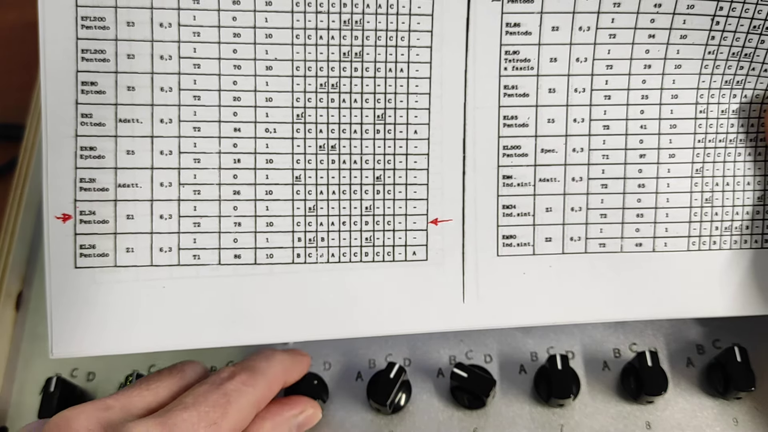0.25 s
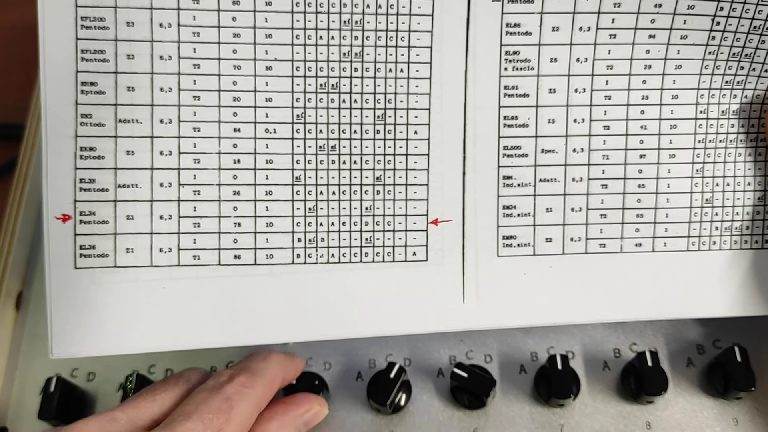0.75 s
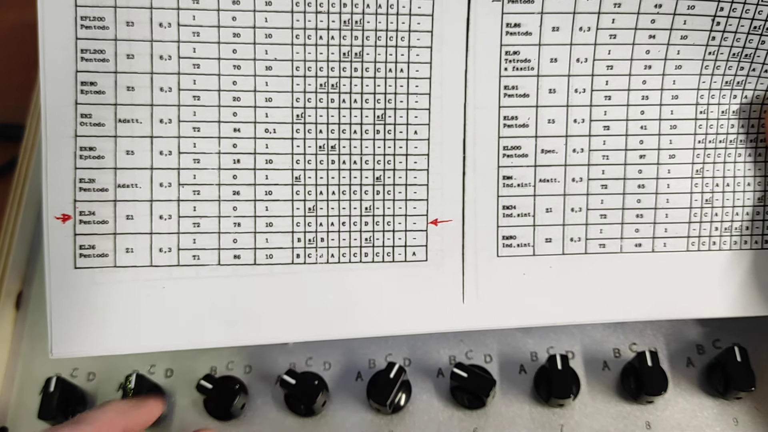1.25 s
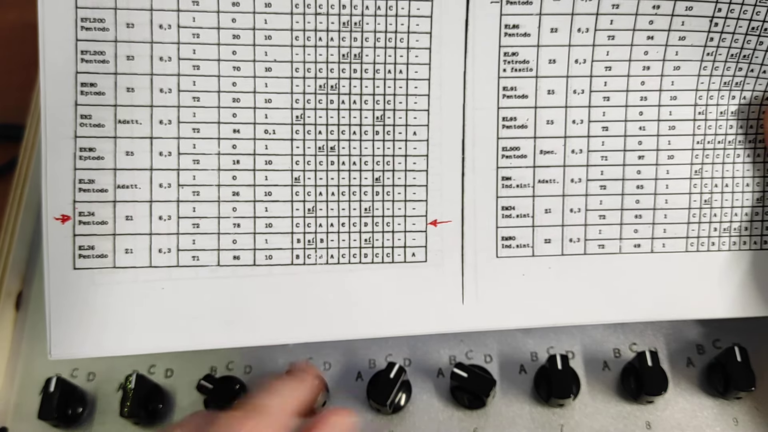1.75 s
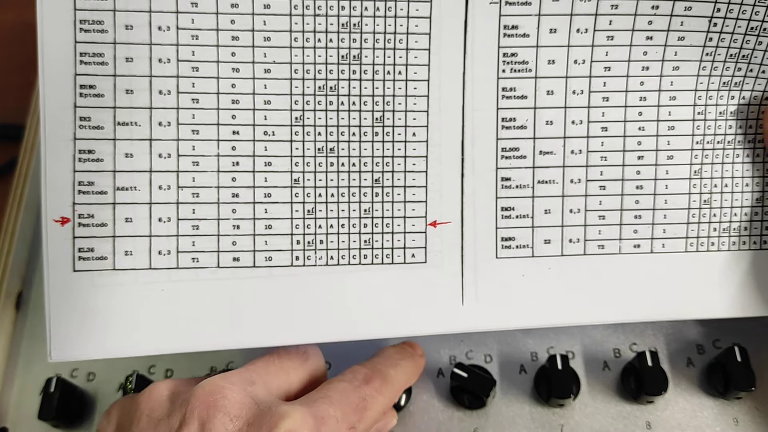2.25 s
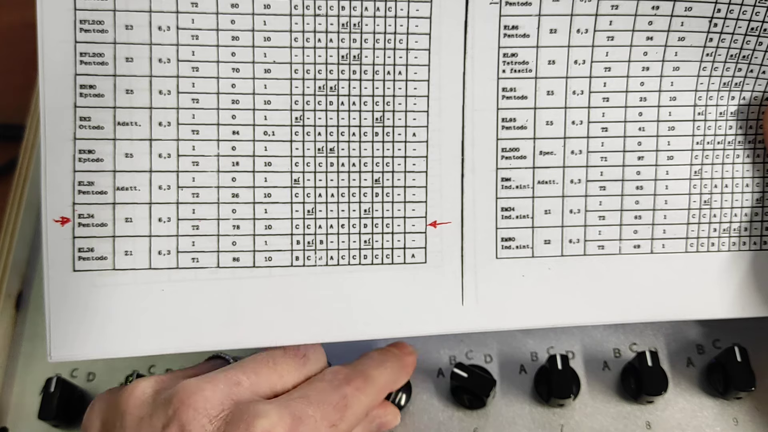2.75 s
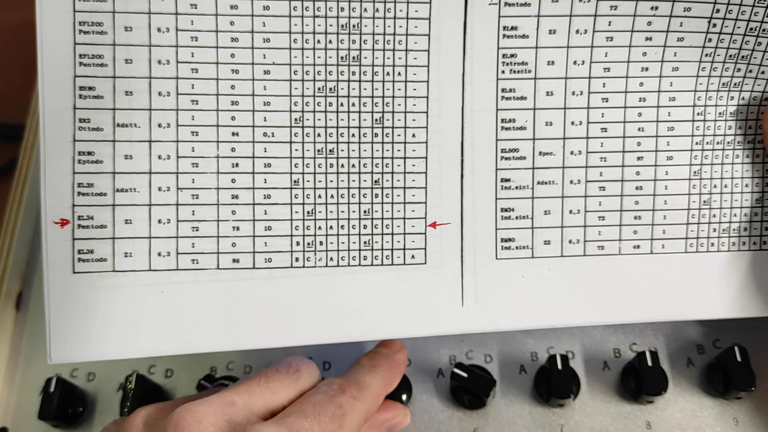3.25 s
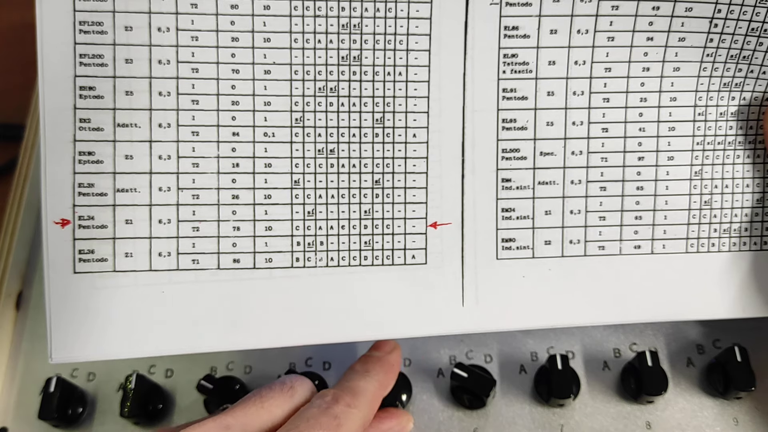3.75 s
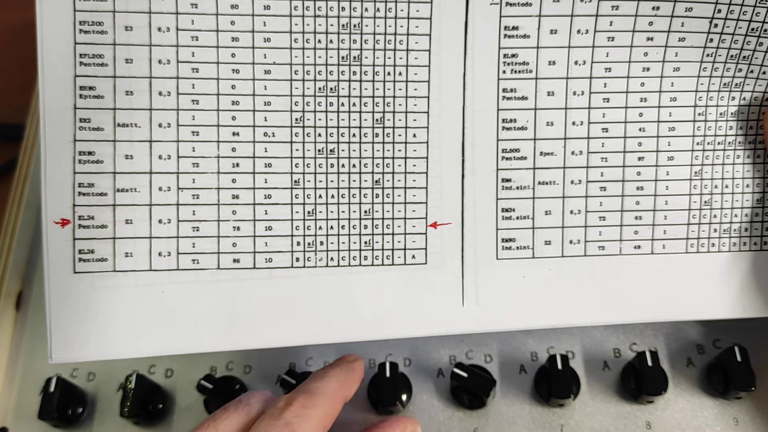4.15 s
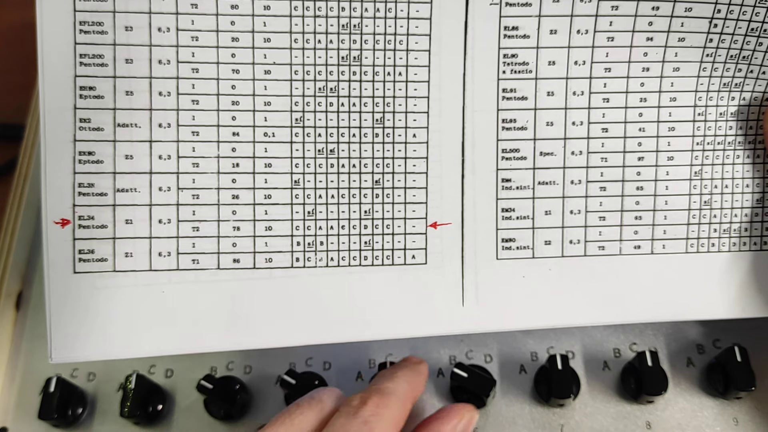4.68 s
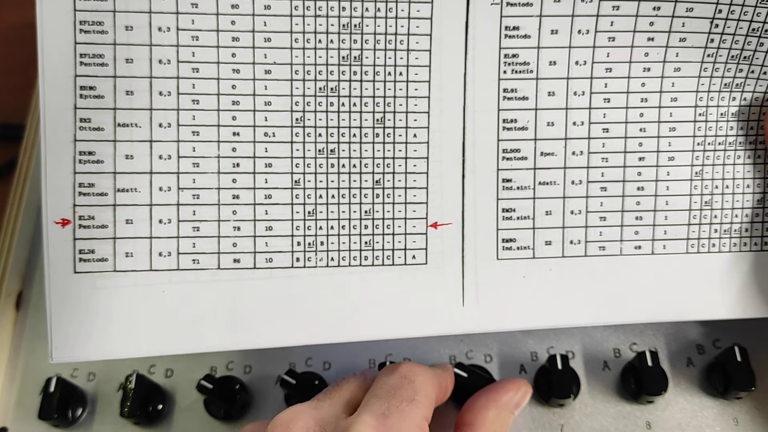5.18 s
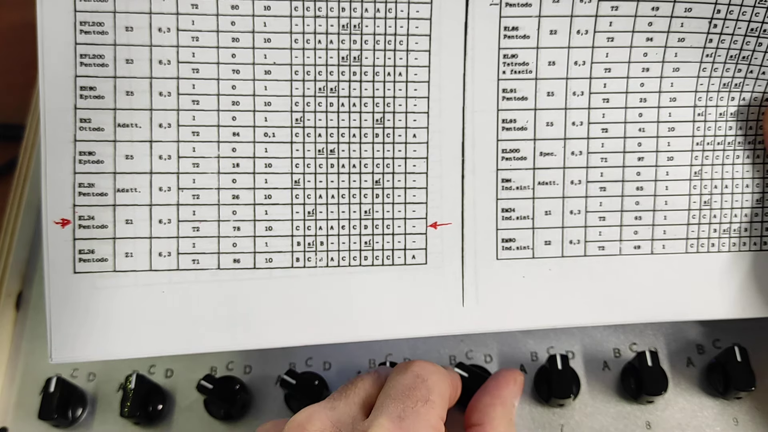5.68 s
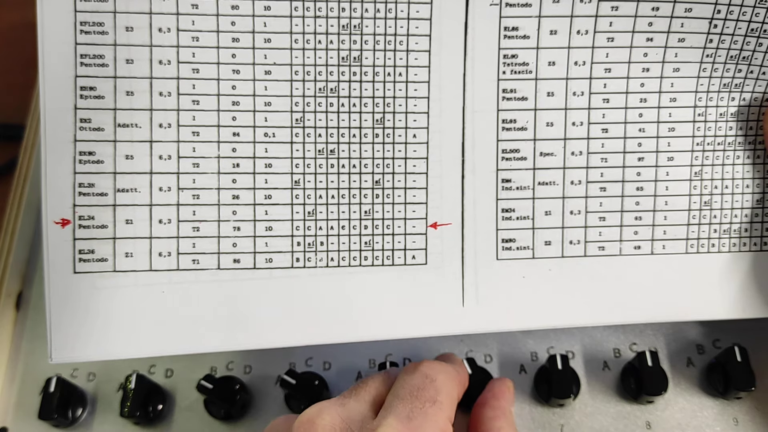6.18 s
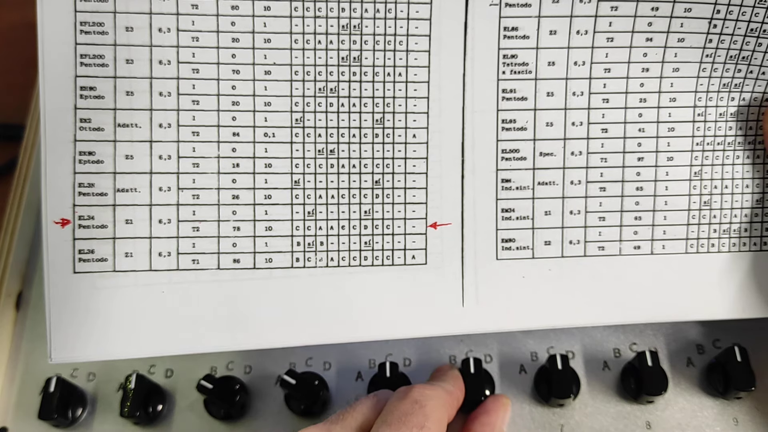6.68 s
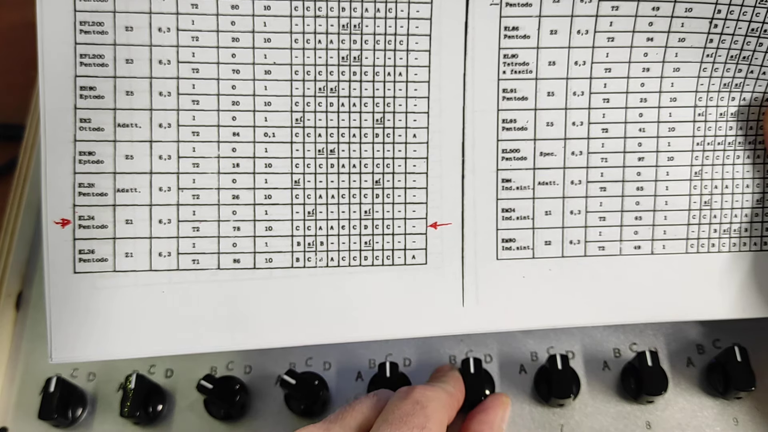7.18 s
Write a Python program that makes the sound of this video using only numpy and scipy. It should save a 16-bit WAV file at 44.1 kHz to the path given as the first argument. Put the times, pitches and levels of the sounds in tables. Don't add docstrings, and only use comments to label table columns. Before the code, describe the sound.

Low muffled traffic and a humming engine are heard first, mostly left, gradually receding. Over them, stiff spring-loaded knobs click on a metal box right beside a stereo microphone: one loud rattly snap early, a weaker one nearly halfway through, then a quick hard pair late. Between them are barely audible dull finger knocks. Each snap is dry and bright with a short, light indoor reverberation.

```python
import sys
import numpy as np
from scipy import signal
from scipy.fft import rfft, irfft, next_fast_len
from scipy.io import wavfile
from scipy.ndimage import uniform_filter1d, minimum_filter1d, map_coordinates

SR = 44100
rng = np.random.default_rng(int(sys.argv[2]) if len(sys.argv) > 2 else 0)


def output_pcm(signal):
    pcm = np.clip(np.atleast_2d(signal).T, -1, 1) * 32767
    wavfile.write(sys.argv[1], SR, np.round(pcm).astype(np.int16))


def amplitude_ratio(level_db):
    exponent = np.asarray(level_db, float) / 20
    return 10 ** exponent


N = 327663

# resonance in Hz, width in Hz.
PORTS = [(8370, 830), (7210, 670)]


def unit(x):
    return x / np.sqrt(np.mean(x ** 2) + 1e-20)


def along(points, hz):
    f, v = np.transpose(points)
    return np.interp(np.log(hz + 1), np.log(f + 1), v)


def curves(rows):
    s, *cols = np.transpose(rows)
    return [np.interp(np.arange(N) / SR, s, c) for c in cols]


def wobble(rate):
    knots = rng.standard_normal(int(N * rate / SR) + 4)
    return map_coordinates(knots, [np.arange(N) * rate / SR])


def filtered(x, response):
    m = next_fast_len(x.shape[-1] + SR // 4)
    shaped = rfft(x, m) * response(np.fft.rfftfreq(m, 1 / SR))
    return irfft(shaped, m)[..., :x.shape[-1]]


def band(x, low_hz, high_hz):
    return signal.sosfilt(signal.butter(2, [low_hz, high_hz], "band", fs=SR, output="sos"), x)


def add(into, x, s):
    part = into[:, round(s * SR):][:, :x.shape[-1]]
    part += x[..., :part.shape[-1]]


def passing(base_db, rows):
    t = np.arange(N) / SR
    gain = 0
    for s, db, swell, fade in rows:
        gain = gain + amplitude_ratio(db) * np.exp(-((t - s) / np.where(t < s, swell, fade)) ** 2)
    return 20 * np.log10(np.hypot(amplitude_ratio(base_db), gain))


def rush(spectrum, patchy_db):
    # frequency in Hz, likeness of left and right from 0 to 1.
    alike = [(40, 0.85), (150, 0.91), (300, 0.7), (600, 0.17), (1200, .35), (2500, .2), (5000, .05)]
    # frequency in Hz, left over right in dB.
    lean = [(40, 3), (110, 6), (400, 4), (1300, 3.5), (2400, 1), (5000, -1)]
    lead_s = 0.00043
    z = signal.stft(rng.standard_normal((2, N)), nperseg=1024)[2]
    patches = uniform_filter1d(rng.standard_normal(z.shape[1:]), size=6, axis=0)
    patches = uniform_filter1d(patches, size=8, axis=1)
    pair = signal.istft(z * amplitude_ratio(patchy_db * unit(patches)), nperseg=1024)[1][:, :N]

    def mid_and_side(hz):
        angle = np.arccos(np.clip(along(alike, hz), -1, 1)) / 2
        return amplitude_ratio(along(spectrum, hz)) * [np.cos(angle), np.sin(angle)]

    def left_and_right(hz):
        half = amplitude_ratio(along(lean, hz) / 2) * np.exp(1j * np.pi * hz * lead_s)
        return np.array([half, 1 / half])

    mid, side = filtered(pair, mid_and_side)
    both = filtered(np.array([mid + side, mid - side]), left_and_right)
    return both / np.std(both.mean(axis=0))


def hiss():
    # frequency in Hz, level in dB per Hz.
    hiss_color = [(200, -37.5), (1500, -6), (4000, 5.5), (9000, 0.5), (11000, -11), (16000, -20)]
    return unit(filtered(rng.standard_normal((2, N)), lambda hz: amplitude_ratio(along(hiss_color, hz))))


def traffic():
    # time in seconds, tyre rush in dB.
    stream = [(0, -65.5), (1.1, -66), (1.4, -69.5), (2.2, -73), (3.2, -71), (3.7, -74.5), (4.5, -74.5),
              (5.7, -80), (6.8, -83), (7.43, -78)]
    # loudest moment in seconds, level in dB, swell in seconds, fade in seconds.
    vans = [(0.01, -62.5, 0.14, 0.37), (.75, -59.5, 0.3, 0.55), (1.4, -69.5, 0.33, 0.46),
            (3.1, -73.5, 0.45, 0.52), (4.75, -65.5, 0.14, 0.35), (5.3, -68, 0.34, 0.36),
            (6.001, -72, .4, 0.6), (6.9, -72, 0.89, .6)]
    lorries = [(.3, -61, .3, 0.56), (.93, -55, 0.1, 0.52), (1.9, -62.5, 0.27, .6), (3, -63, 0.39, .3),
               (3.65, -60.5, 0.23, 0.092), (4.8, -63.5, 0.45, .3), (5.75, -67, .1, .1),
               (6.4, -64, 0.16, 0.33), (7.18, -64, 0.11, 0.33)]
    # frequency in Hz, level in dB per Hz.
    rumble_color = [(12, -30.5), (20, -1.5), (38, -2.5), (54, 0.5), (67, -11), (85, -13.5), (110, -48),
                    (190, -120)]
    drone_color = [(64, -36), (108, -9.5), (172, -1), (264, -6.5), (421, -14), (479, -15.5), (676, -14.5),
                   (749, -17.5), (1000, -15), (1300, -45), (2200, -120)]
    tyre_color = [(290, -28), (500, 0), (606, -4), (1090, 3.5), (1320, -2.5), (1720, -3), (2060, -7.5),
                  (2750, -12.5), (3240, -20.5), (5000, -33.5), (6500, -56), (11000, -120)]
    # time in seconds, pitch in Hz, level in dB.
    engine = [(0, 120.4, -89), (.2, 124, -62.5), (.45, 123.7, -51.5), (.95, 123.9, -59), (1.2, 125.6, -64),
              (1.8, 128.5, -70.5), (2.65, 133.5, -74.5), (3.6, 132.6, -72), (4.3, 131.6, -89.5)]
    tyre_db, = curves(stream)
    swing = tyre_db - tyre_db.mean()
    rumble_db = passing(-68 + 0.28 * swing, lorries)
    drone_db = passing(-74 + 0.3 * swing, vans)
    air_db = -82 + 0.56 * swing
    road = amplitude_ratio(rumble_db + 0.6 + 0.4 * wobble(10)) * rush(rumble_color, patchy_db=-0.5)
    road += amplitude_ratio(drone_db + 3.5 + 1.5 * wobble(3.1)) * rush(drone_color, patchy_db=1.5)
    road += amplitude_ratio(tyre_db + 1.37 + 0.38 * wobble(5.4)) * rush(tyre_color, patchy_db=-0.6)
    road += amplitude_ratio(air_db - 12.5) * hiss()
    hz, engine_db = curves(engine)
    tone = np.sin(2 * np.pi * np.cumsum(hz + 0.57 * wobble(2.3)) / SR)
    left_right = amplitude_ratio([[2.4], [-2.6]])
    return road + amplitude_ratio(engine_db + 2.5 + 0.6 * wobble(13)) * tone * left_right


def chatter(landing_db, dies, after, rebound_db):
    gap_s, jitter, scatter_db = 0.0015, 0.1, 1.5
    run_up_db_per_ms, rebound_wide_s = 6, 0.004
    step = np.arange(-1, 10)
    luck = rng.standard_normal((3, len(step))) * (step > 0)
    s = gap_s * (step + jitter * luck[0])
    slope = np.where(s < 0, run_up_db_per_ms, -dies)
    landing = amplitude_ratio(landing_db + 1000 * s * slope + np.c_[[0, -1.5]])
    bump = np.exp(-((s - after) / rebound_wide_s) ** 2) * (s > 0)
    rebound = amplitude_ratio(rebound_db + np.c_[[-9, 0]]) * bump
    gains = np.hypot(landing, rebound) * amplitude_ratio(scatter_db * luck[1:])
    return np.c_[s, gains.T]


def contacts():
    # ball landing in seconds, landing in dB, chatter dying in dB per ms,
    # rebound after landing in seconds, rebound in dB.
    detents = [(.7495, -3, 1.6, .0075, -12), (2.9997, -15, 1.1, .0088, -18), (6.0064, -3, 6.5, .0055, -11),
               (6.3222, -2, 5, .0066, -12)]
    # low Hz, high Hz, level in dB.
    steel = [(1400, 3800, -21), (3800, 3900, -16.5), (5200, 6300, -8), (8800, 14000, -10.5),
             (11660, 15800, -7)]
    out = np.zeros((2, N + SR))
    t = np.arange(-66, 200) / SR
    shape = np.exp(-(t / np.where(t < 0, 0.0003, 0.0005)) ** 2)
    for landing_s, *how in detents:
        for s, *gain in chatter(*how):
            add(out, np.c_[gain] * shape, landing_s + s + t[0] - 0.00025)
    noise = rng.standard_normal(out.shape)
    near = [band(side, hz - 900, hz + 1500) for side, (hz, _) in zip(noise, PORTS)]
    phase = np.angle(signal.hilbert(near, next_fast_len(N + SR)))
    note = np.cos(phase)[:, :N + SR]
    grit = sum(amplitude_ratio(db) * unit(band(noise, low_hz, high_hz)) for low_hz, high_hz, db in steel)
    return out * amplitude_ratio([[-15], [-13]]) * (note + grit)


def blow(levels_db, modes, alike):
    # low Hz, high Hz, delay in seconds, rise in seconds, 60 dB decay in seconds.
    parts = [(4180, 9700, .0003, 0.0015, 0.028), (2140, 3500, 0.0031, 0.0021, .04),
             (540, 1400, 0.00067, 0.0022, 0.047), (220, 440, 0.0045, 0.0037, 0.09),
             (128, 185, .018, 0.024, 0.1)]
    t = np.arange(SR // 4) / SR
    out = np.zeros((2, len(t)))
    for db, (low_hz, high_hz, delay, rise, t60) in zip(levels_db, parts):
        share = np.clip(alike * 1000 / high_hz + 0.2, 0, 0.9)
        noise = rng.standard_normal((2, len(t))) * (1 - share) + rng.standard_normal(len(t)) * share
        late = np.maximum(t - delay, 0)
        gain = amplitude_ratio(db + 7 - 60 * late / t60) * (1 - np.exp(-late / rise))
        out += gain * unit(band(noise, low_hz, high_hz))
    late = np.maximum(t - 0.0045, 0)
    for hz, db, t60 in modes:
        gain = amplitude_ratio(levels_db[2] + db + 1.5 - 60 * late / t60) * (1 - np.exp(-late / 0.0018))
        out += gain * np.sin(2 * np.pi * hz * late + rng.normal(0, 0.42, (2, 1)))
    return out


def room(x):
    # frequency in Hz, 60 dB decay in seconds.
    decay = [(150, 0.13), (700, 0.25), (2000, .4), (5000, 0.39), (8000, 0.33193), (14000, .3)]
    # frequency in Hz, level in dB against the direct sound.
    strength = [(150, -34), (700, -32.5), (2500, -31), (4000, -30.5), (5800, -31), (8000, -36), (9500, -31),
                (11000, -33), (14800, -34.5), (15900, -51)]
    hz, t, z = signal.stft(rng.standard_normal((2, SR * 3 // 5)), SR, nperseg=256)
    z = z * amplitude_ratio(-60 * t / along(decay, hz)[:, None]) * (1 - np.exp(-t / 0.0065))
    z = z * amplitude_ratio(along(strength, hz))[:, None] / np.linalg.norm(z, axis=2, keepdims=True)
    tail = signal.istft(z, SR, nperseg=256)[1] / 8
    tail = np.pad(tail, ((0, 0), (round(0.0055 * SR), 0)))
    return signal.fftconvolve(x, tail, axes=1)


def switches():
    # start in seconds, then spring buzz, chassis, case and bench in dB.
    snaps = [
        (0.7476, -24, -28, -52, -50.5),
        (2.999, -30, -36.5, -49, -46),
        (6.0043, -34, -35.5, -47.5, -39),
        (6.3206, -26.5, -36.5, -44, -36),
    ]
    # start in seconds, then tick, plate, chassis and case in dB.
    taps = [(1.569, -87, -89, -73, -65.5), (1.726, -83, -87.5, -61.5, -60.5), (2.647, -71.5, -70, -67, -67),
            (3.4, -99, -91, -67.5, -78), (5.45, -99, -96.5, -65.5, -69), (6.532, -91, -85, -58, -61)]
    # Hz, level in dB, 60 dB decay in seconds.
    chassis = [
        [(684, 0.5, .09), (830, -5.5, 0.041), (1214, -3, .06), (2463, 4, .04), (3050, -7.5, .05)],
        [(272, -6, 0.21), (313, 4.5, 0.042), (780, -1.5, 0.058), (1084, -3, 0.031), (2626, -8, 0.0466),
         (3280, -1, 0.028)],
        [(673, 1.5, 0.097), (1119, 6.5, 0.056), (911, -2, 0.045), (2420, -7, 0.04), (3056, -0.5, 0.04)],
        [(707, 1, 0.094), (1123, 5.5, 0.053), (430, 1, 0.021), (2325, -14, 0.05), (3100, -14, 0.0566)],
    ]
    # Hz, level in dB, 60 dB decay in seconds.
    held = [(657, 4, 0.057), (1020, -32, 0.016)]
    plate_db, tap_bench_db = 2.5, -87
    clicks = contacts()
    body = np.zeros_like(clicks)
    for (s, spring_db, chassis_db, *low_db), modes in zip(snaps, chassis):
        levels_db = [spring_db, chassis_db + plate_db, chassis_db, *low_db]
        add(body, blow(levels_db, modes, alike=0.21), s)
    for s, *parts_db in taps:
        add(body, blow([*parts_db, tap_bench_db], held, alike=0.47), s)
    out = clicks + body
    sent = clicks + amplitude_ratio(-3) * body
    for s, *_ in [*snaps, *taps]:
        add(out, room(sent[:, round(s * SR):][:, :SR // 7]), s)
    return out[:, :N]


def scene():
    return switches() + traffic()


def roll_off(x):
    return signal.sosfilt(signal.butter(12, 16740, fs=SR, output="sos"), x)


def record(dry):
    fc, width = np.transpose(PORTS)[:, :, None]
    ported = filtered(dry, lambda hz: fc ** 2 / (fc ** 2 - hz ** 2 + 1j * hz * width))
    top = signal.cheby1(8, 1, 16000, fs=SR, output="sos")
    x = signal.sosfilt(top, ported + amplitude_ratio(-85.5) * hiss())
    need = np.minimum(1, 0.79 / (np.abs(x) + 1e-9))
    x = x * uniform_filter1d(minimum_filter1d(need, size=41), size=21)
    return roll_off(x)


dry = scene()
out = record(dry)
output_pcm(out)
```